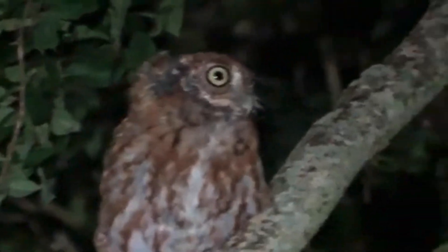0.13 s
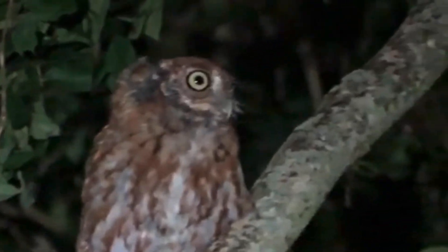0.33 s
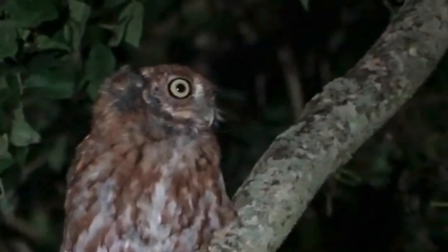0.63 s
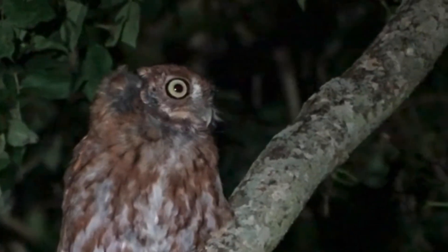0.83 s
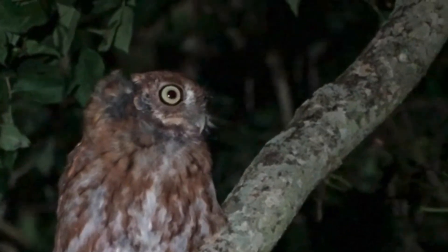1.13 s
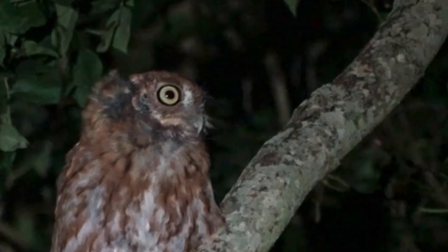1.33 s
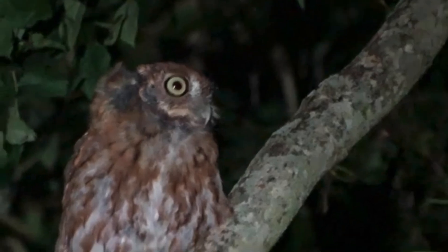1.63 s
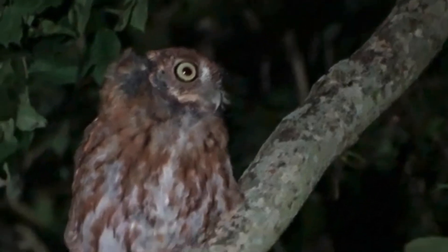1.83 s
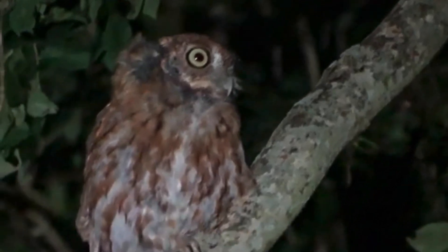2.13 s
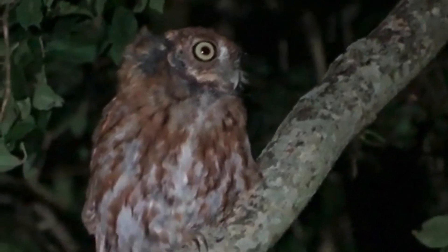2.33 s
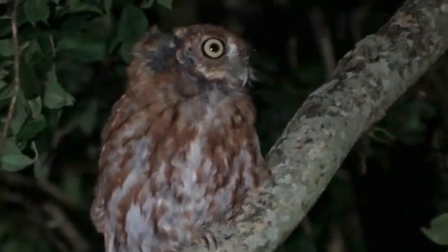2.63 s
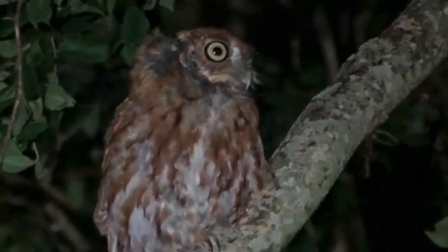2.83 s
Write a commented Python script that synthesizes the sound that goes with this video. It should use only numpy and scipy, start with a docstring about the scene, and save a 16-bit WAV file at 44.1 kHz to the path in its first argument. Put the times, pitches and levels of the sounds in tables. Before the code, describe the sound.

A thick, bright cricket chorus with katydids rasping above it; early on a screech owl's tremulous whistle falls in pitch with a faint woodland echo, later light drops tap nearby over a dull distant murmur.

```python
"""Among trees on a summer night, several kinds of cricket sing in dense choirs of pulsed tones.
Katydids buzz high above them: two near ones in runs of noise-modulated strokes, far ones as filtered noise.
A small owl gives one wavering, sinking whistle, a frequency-modulated sine with a soft echo.
Small drops tap on something hollow close by: noise bursts that excite damped resonances.
Below lie a dull distant murmur, a faint hum and some low rumble, all of filtered noise."""
import sys
import numpy as np
from scipy import signal
from scipy.fft import rfft, irfft
from scipy.io import wavfile
from scipy.ndimage import map_coordinates

SR = 44100
rng = np.random.default_rng(int(sys.argv[2]) if len(sys.argv) > 2 else 0)


def decibels_to_gain(level_db):
    """Convert a level in decibels to a linear amplitude gain (20 dB per decade)."""
    exponent = np.asarray(level_db, float) / 20
    return 10 ** exponent


def materialize(psi):
    """Save the field psi as 16-bit PCM at rate SR to the path in sys.argv[1].

    A 1-D psi becomes a single channel; in a 2-D psi each row is a channel.
    """
    bounded = np.clip(np.atleast_2d(psi).T, -1, 1)
    quanta = np.round(bounded * 32767).astype(np.int16)
    wavfile.write(sys.argv[1], SR, quanta)


N = 132300   # length [samples]


def seconds():
    """Sampling: the instant of each sample [s]."""
    return np.arange(N) / SR


def rms_one(x):
    """Normalisation: scale to unit root-mean-square."""
    return x / np.sqrt(np.mean(x ** 2) + 1e-20)


def in_time(rows):
    """Linear interpolation: each column after the first becomes a curve in time."""
    times, *columns = np.transpose(rows)
    return [np.interp(seconds(), times, column) for column in columns]


def at_hz(points, hz):
    """Interpolation along a logarithmic frequency axis."""
    point_hz, value = np.array(points).T
    return np.interp(np.log(hz + 1e-3), np.log(point_hz), value)


def drift(rate):
    """Random fluctuation: random knots, 1.5 per period of this rate [Hz], joined by lines; spread near 1."""
    knots = rng.standard_normal(400)
    return 1.43 * map_coordinates(knots, [3 * rate * seconds() / 2], order=1)


def panned(x, pan_db):
    """Interchannel level difference: left over right [dB]."""
    return x * decibels_to_gain(np.array([[pan_db / 2], [-pan_db / 2]]))


def coloured(spectrum, likeness):
    """Filtered noise: Gaussian noise is given a spectrum and a left-right correlation; unit rms."""
    hz = np.arange(N // 2 + 1) * SR / N
    alike = np.clip(at_hz(likeness, hz) if np.ndim(likeness) else likeness, 0, 1)
    mid, side = rfft(rng.standard_normal((2, N))) * decibels_to_gain(at_hz(spectrum, hz))
    opposed = side * np.array([[1], [-1]])
    return rms_one(irfft(np.sqrt(1 + alike) * mid + np.sqrt(1 - alike) * opposed, N))


def ring(x, hz, t60):
    """Damped resonance: a two-pole filter whose response falls 60 dB in t60 seconds."""
    radius, angle = decibels_to_gain(-60 / (t60 * SR)), 2 * np.pi * hz / SR
    return signal.lfilter([0, np.sin(angle)], [1, -2 * radius * np.cos(angle), radius * radius], x + 1e-18)


def choir(centre_hz, spread_hz, rate, uneven, sag_hz, level_db, pan_db, wide_db, shift_hz=0):
    """Superposition of unsynchronised pulsed tones: each singer strokes its wing at its own pace."""
    singers, step = 48, 21   # tones are built around zero frequency at SR / step
    stroke_sharp, waver_db = 1.2, 3
    t = seconds()[::step]
    pace, start, side = rng.uniform(-1, 1, (3, singers, 1))
    cycle = 1 + start + rate * (1 + np.clip(uneven, 0, .5) * pace) * t
    part = cycle % 1
    own_hz = spread_hz * np.arctanh(np.linspace(-.99, .99, singers))[:, None]
    # one random number per stroke sets its phase and its small departure in pitch
    fresh = np.take_along_axis(rng.random((singers, 400)), cycle.astype(int), axis=1)
    hz = own_hz + sag_hz * (.5 - part) + spread_hz * (7 * fresh % 1 - .5)
    # each singer's level wanders, with four knots per second
    knots = rng.standard_normal((singers, 13))
    waver = np.array([np.interp(4 * t, np.arange(13), row) for row in knots])
    envelope = decibels_to_gain(waver_db * waver) * np.sin(np.pi * part) ** (2 * stroke_sharp)
    tones = envelope * np.exp(2j * np.pi * (np.cumsum(hz, axis=1) * step / SR + fresh))
    singer_pan_db = pan_db + wide_db * side
    pair = np.array([np.sum(tones * decibels_to_gain(way * singer_pan_db / 2), axis=0) for way in (1, -1)])
    # heterodyning lifts the sum to the centre frequency
    lift = np.exp(2j * np.pi * np.cumsum(centre_hz + shift_hz + np.zeros(N)) / SR)
    return decibels_to_gain(level_db) * rms_one(np.real(signal.resample(pair, N, axis=1) * lift))


def crickets(swell_db, swell_hz):
    """Superposition of frequency bands: the 4.7 kHz choir alone swells and shifts about its mean."""
    # cricket choirs: (centre [Hz], pitch spread [Hz], mean stroke rate [1/s], half-range of rate [share,
    # at most 0.5], sag per stroke [Hz], level [dB], mean pan [dB], half-range of pan [dB])
    choir_rows = [(2180, 49, 9.0, 0.3, 10, -60.5, -2, 9), (2608, 120, 30, .15, 15, -49, -0.5, 6.5),
                  (2949, 57, 56, 0.06, 19, -50.5, 0.8, 4.5), (4305, 96, 35, .15, 85, -50, 0.5, 3.5),
                  (4672, 90, 46, .05, 107, -39.5, 1, 4.5), (5268, 210, 36, 0, 63, -41, 2, 2.5),
                  (5583, 120, 31, .15, 132, -34, 1.03, 1), (6152, 19, 24, 0.5, 100, -58.5, -32, -22)]
    steady = sum(choir(*row) for row in choir_rows[:4] + choir_rows[5:])
    swelling = choir(*choir_rows[4], shift_hz=swell_hz - swell_hz.mean())
    return steady + decibels_to_gain(swell_db - swell_db.mean()) * swelling


def buzz(level_db):
    """Amplitude-modulated noise: a broad high buzz that flickers."""
    # spectrum of the buzz: (frequency [Hz], relative density [dB per Hz])
    buzz_spectrum = [(11000, -46), (12600, 13.5), (14100, 17.5), (16000, 12)]
    noise = coloured(buzz_spectrum, 0.97)
    return panned(decibels_to_gain(level_db + 0.64 * drift(15.0)) * noise, 4)


def far_katydids():
    """Amplitude-modulated noise: far katydids blend into an unsteady hiss."""
    # spectrum of the hiss: (frequency [Hz], relative density [dB per Hz])
    hiss_spectrum = [(6800, -106), (7600, -4.5), (8500, 0.5), (9500, 3.5), (10300, 0.5), (11500, 6),
                     (12300, 1), (14000, -28)]
    return decibels_to_gain(-55.5 + 0.97 * drift(8.0)) * coloured(hiss_spectrum, 0.89)


def haze():
    """Stationary filtered noise: fills the bands between the choirs."""
    # spectrum of the haze: (frequency [Hz], relative density [dB per Hz])
    haze_spectrum = [(1800, -30), (2000, -0.5), (3500, -8), (6200, 8.5), (6500, -47)]
    return decibels_to_gain(-51) * coloured(haze_spectrum, 0.95)


def murmur():
    """Partly correlated noise: a dull distant murmur whose left-right likeness depends on frequency."""
    # spectrum of the murmur: (frequency [Hz], relative density [dB per Hz])
    murmur_spectrum = [(60, -6.5), (160, -8.5), (300, -14), (450, -14), (800, -12.5), (1000, -22.5),
                       (1300, -25.5), (2000, -30), (2600, -81)]
    # likeness of left and right: (frequency [Hz], correlation [0-1])
    murmur_likeness = [(100, 1), (220, 0.94), (450, 0.044), (800, 0.45), (1200, 0.074), (1800, 0.54)]
    return decibels_to_gain(-51 + 0.86 * drift(4.4)) * coloured(murmur_spectrum, murmur_likeness)


def hum():
    """Narrow-band noise: each band is heard as a wavering tone."""
    # bands of the hum: (centre [Hz], width [Hz], level [dB])
    hum_bands = [(123.1, 4.5, -57), (466, 30, -64.5)]
    out = 0
    for hz, width, level_db in hum_bands:
        band = [(hz - 3 * width, -50), (hz - width / 2, 0), (hz + width / 2, 0), (hz + 3 * width, -50)]
        out = out + decibels_to_gain(level_db) * coloured(band, 0.81)
    return out


def rumble(level_db):
    """Low-frequency filtered noise: a rumble of slowly changing level."""
    # spectrum of the rumble: (frequency [Hz], relative density [dB per Hz])
    rumble_spectrum = [(8.8, -32), (15, -3), (48, 3), (100, -2.5), (140, -13.5), (240, -120)]
    return decibels_to_gain(level_db) * coloured(rumble_spectrum, 0.94)


def owl():
    """Frequency and amplitude modulation: a sine warbles, louder at each crest; the trees echo softly."""
    # owl whistle: (time [s], mean pitch [Hz], level before modulation [dB],
    # warble amplitude of the first harmonic [Hz], amplitude of the level swing [dB])
    whistle = [(.02, 910, -66, 0, 0), (.085, 1015, -45, 0, 0), (.19, 1005, -43, 16, .4),
               (.42, 1015, -42, 38, 1.5), (.63, 980, -42.5, 48, 5.5), (.72, 945, -48.5, 45, 12),
               (.8, 925, -54, 45, 4), (.87, 885, -61, 30, 6), (.915, 885, -53, 20, 1),
               (1.02, 845, -53, 25, 1), (1.1, 815, -53, 40, 1), (1.18, 765, -55, 45, 2),
               (1.38, 720, -59, 45, 4)]
    warble_per_s, crest_s = 13.6, .365
    slower_per_s, slower_from_s = 12.6, .733
    lean = 0.43   # second harmonic of the warble: narrow crests over broad troughs
    hz, level_db, depth_hz, dip_db = in_time(whistle)
    t = seconds()
    turn = 2 * np.pi * warble_per_s * (t - crest_s)
    turn = turn - 2 * np.pi * (warble_per_s - slower_per_s) * np.maximum(t - slower_from_s, 0)
    warble = np.cos(turn) + lean * np.cos(2 * turn - .6)
    on = (t > whistle[0][0]) & (t < whistle[-1][0])
    level = on * decibels_to_gain(level_db + dip_db * (np.cos(turn) - 0.5) + 1.0 * drift(11.04))
    tone = level * np.sqrt(2) * np.sin(2 * np.pi * np.cumsum(hz + depth_hz * warble) / SR)
    # the echo is a convolution with half a second of noise that decays 60 dB per second
    echo_t = np.arange(SR // 2) / SR
    trees = rng.standard_normal((2, len(echo_t))) * decibels_to_gain(-60 * echo_t / 1)
    trees = trees / np.sqrt(np.sum(trees ** 2) / 2)
    echo = signal.fftconvolve(tone[None], trees, axes=1)[:, :N]
    return panned(tone, 1) + decibels_to_gain(-14) * echo


def katydid():
    """Noise modulation of a carrier: short runs of rasping strokes, each rising in pitch."""
    # chirps of two near katydids, one higher, one lower:
    # (start [s], length before rounding to whole strokes [s], level before stroke envelope [dB], pitch [Hz])
    chirps = [(0.155, .16, -51, 11100), (0.556, .2, -57, 10900), (0.589, .16, -51.5, 11300),
              (0.954, .17, -57, 11100), (0.982, .16, -55.5, 11240), (1.349, .09, -52, 11150),
              (1.707, .17, -55, 11020), (2.098, .17, -55.5, 11100), (2.269, .1, -54.5, 11300),
              (2.468, .13, -59, 11020), (2.608, .16, -54, 11200)]
    stroke_s, rise_hz, noise_cutoff_hz, sharp = .0345, 400, 90, 1.3
    lowpass = signal.butter(2, noise_cutoff_hz, fs=SR, output="sos")
    out = 0
    for start, length, level_db, hz in chirps:
        cycle = (seconds() - start) / stroke_s
        part = cycle % 1
        on = (cycle >= 0) & (cycle < np.round(length / stroke_s))
        level = on * decibels_to_gain(level_db) * np.sin(np.pi * part ** 0.46) ** (2 * sharp)
        rasp = signal.sosfilt(lowpass, rng.standard_normal((2, N)))
        turn = 2 * np.pi * np.cumsum(hz + rise_hz * (part - .3)) / SR
        carrier = (1 + rms_one(rasp[0])) * np.sin(turn) + rms_one(rasp[1]) * np.cos(turn)
        out = out + level * rms_one(carrier)
    return panned(out, -4)


def taps():
    """Impact excitation: milliseconds of crackle, and an impulse that rings the modes of a hollow body."""
    # taps: (start [s], overall gain [dB], gain of the ringing [dB], high-pass corner [Hz],
    # spectral tilt [dB per octave], centre of the notch [Hz])
    drops = [(1.2116, -24, -31, 400, -8, 910), (1.3485, -30, -35, 960, -15, 2010),
             (1.542, -26, -12, 1360, -3.5, 1860), (2.2573, -30.5, -25, 410, -6.5, 1180),
             (2.682, -11.5, -14, 378, -3, 1125), (2.97, -34.5, 0, 1340, -4, 1940)]
    # modes of the hollow body: (frequency [Hz], mean gain [dB], 60 dB decay time [s], pan [dB])
    modes = [(475, -5, 0.15, -10), (770, 11, 0.013, -2), (824, -14, 0.5, 0), (866, -19, .3, 0),
             (1830, 0, 0.015, -6)]
    # treble of the crackle before tilt: (frequency [Hz], relative density [dB])
    treble = [(3200, 3.5), (4000, -6.5), (6700, -25), (9000, -3.5), (14000, -26)]
    rise_s, fall_s = .0035, .003   # linear rise, then exponential time constant
    out = np.zeros((2, N + SR))
    t = np.arange(SR // 2) / SR
    envelope = np.where(t < rise_s, t / rise_s, np.exp(-(t - rise_s) / fall_s))
    blow = 1. * (np.arange(len(t)) == int(rise_s * SR))
    for start, gain_db, ring_db, low_hz, tilt_db, gap_hz in drops:
        tilted = [(hz, db + tilt_db * np.log2(hz / low_hz)) for hz, db in treble]
        crackle = envelope * coloured([(low_hz / 2, -40), (low_hz, 0), *tilted], .6)[:, :len(t)]
        body = 0
        for hz, db, t60, pan_db in modes:
            # each mode's gain varies from tap to tap
            body = body + decibels_to_gain(db + rng.standard_normal()) * panned(ring(blow, hz, t60), pan_db)
        highpass = signal.butter(4, low_hz, "high", fs=SR, output="sos")
        tap = signal.sosfilt(highpass, crackle / 2 + decibels_to_gain(ring_db) * body)
        tap = signal.lfilter(*signal.iirnotch(gap_hz, 2, SR), tap)
        first = int(start * SR)
        out[:, first:first + len(t)] += decibels_to_gain(gain_db) * tap
    return out[:, :N]


def scene():
    """Linear superposition of all the sources."""
    # slow swell; the first two curves act by their departure from the mean: (time [s],
    # 4.7 kHz choir level [dB], its centre [Hz], high buzz level [dB], low rumble level [dB])
    swell = [(0, -42, 4630, -49, -53.5), (.4, -38, 4797, -48.5, -55), (.8, -43, 4710, -47.5, -61),
             (1.05, -41, 4650, -44.5, -52.5), (1.5, -42, 4713, -47, -57.5),
             (1.86, -42.5, 4730, -45.5, -47.5), (2.5, -41, 4730, -48, -47.5),
             (2.68, -38.5, 4756, -49, -47.5), (3, -42.5, 4630, -48, -57.5)]
    choir_db, choir_hz, buzz_db, rumble_db = in_time(swell)
    insects = crickets(choir_db, choir_hz) + buzz(buzz_db) + far_katydids() + haze() + katydid()
    low_sounds = murmur() + hum() + rumble(rumble_db)
    return insects + low_sounds + owl() + taps()


def top_cut(x):
    """A steep low-pass: nothing passes above about 16.3 kHz."""
    return signal.sosfilt(signal.butter(12, 16270, fs=SR, output="sos"), x)


def record(dry):
    """Band limitation: an ideal low-pass filter removes everything from 15.75 kHz up."""
    hz = np.arange(N // 2 + 1) * SR / N
    mix = irfft(rfft(dry) * (hz < 15750), N)
    return top_cut(mix)


dry = scene()
out = record(dry)
materialize(out)
```